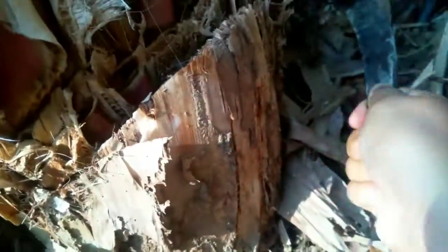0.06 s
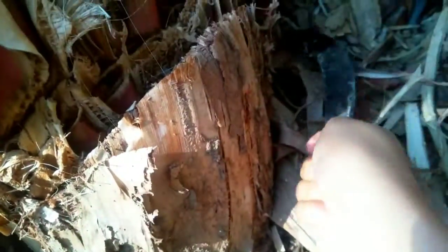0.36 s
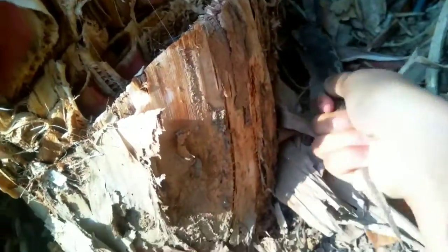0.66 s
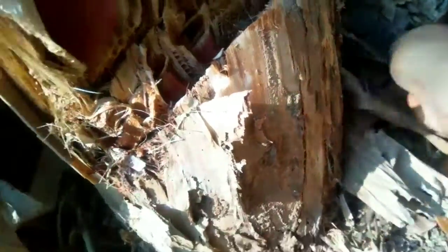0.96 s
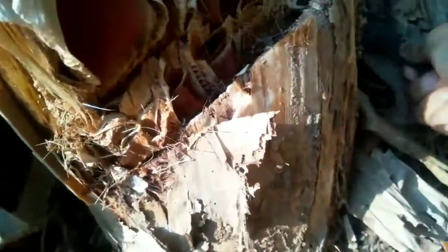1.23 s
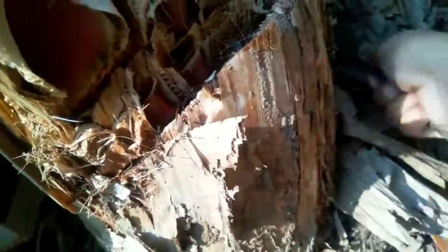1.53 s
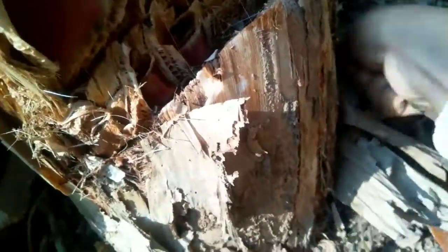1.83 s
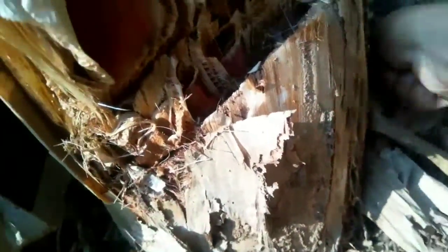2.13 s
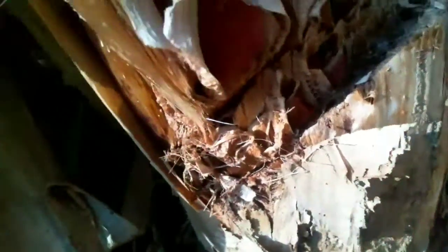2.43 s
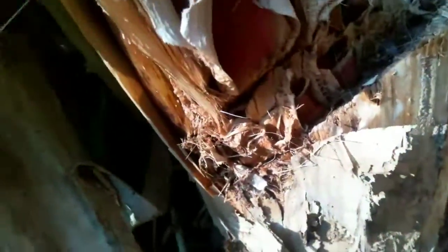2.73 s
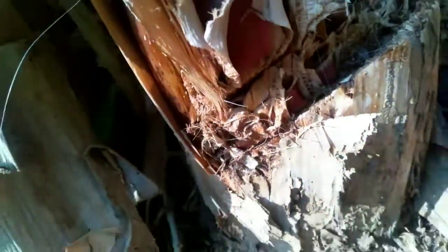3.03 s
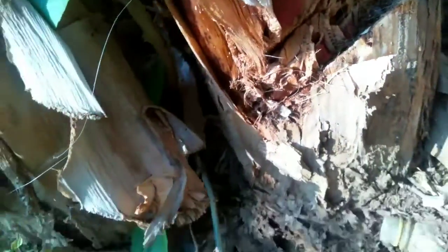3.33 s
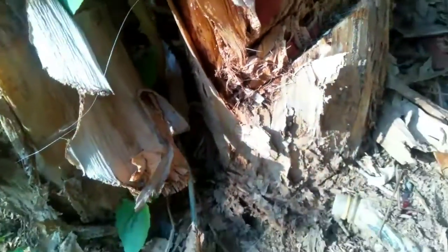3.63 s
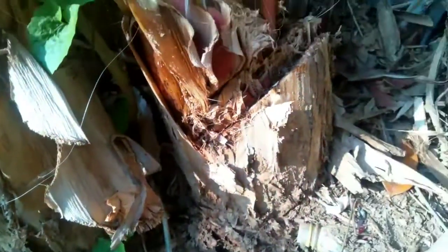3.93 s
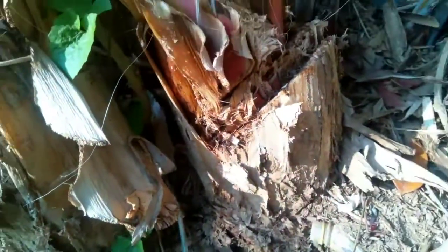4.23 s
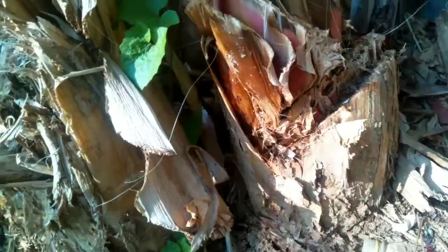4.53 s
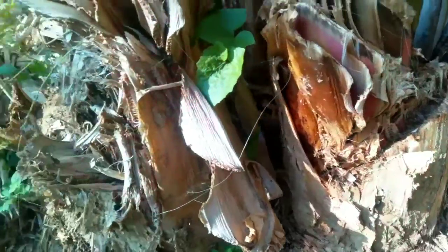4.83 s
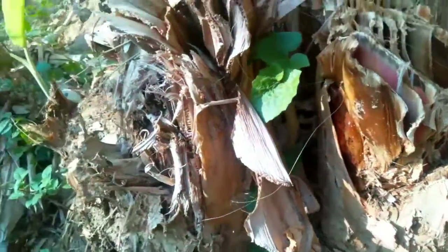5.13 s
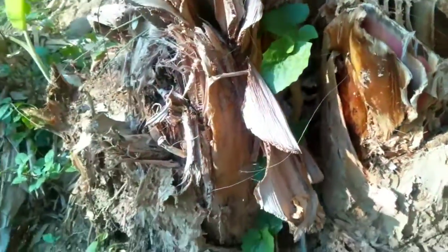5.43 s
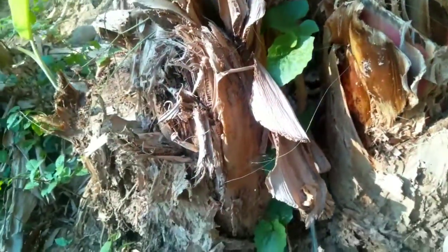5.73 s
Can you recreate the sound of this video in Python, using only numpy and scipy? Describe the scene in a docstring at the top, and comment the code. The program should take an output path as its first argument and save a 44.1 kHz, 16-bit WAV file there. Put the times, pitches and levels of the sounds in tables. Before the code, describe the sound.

Dry banana leaf sheaths are pulled off a stem by hand outdoors, making close, irregular papery rips, crackles and sharp little snaps.

```python
"""Outdoors, close up: dry banana leaf sheaths are pulled off the stem by hand.
Each pull builds, rips and lets go; a swarm of breaking fibres ticks, shakes the papery sheet and
makes its curled hollow rumble. Ribs snap singly, folds pop over, the stem takes dull knocks.
A knife brushes the sheath at the start and rings thinly. Between pulls the loose sheath rustles,
ticks and once squeaks. Far behind: faint chirps and the murmur of open air."""
import sys
import numpy as np
from scipy import signal
from scipy.fft import rfft, irfft
from scipy.io import wavfile
from scipy.ndimage import uniform_filter1d

SR = 44100
rng = np.random.default_rng(int(sys.argv[2]) if len(sys.argv) > 2 else 0)


def to_wav(s):
    """Save 16-bit WAV."""
    ch = np.atleast_2d(s).T  # columns
    pcm = np.round(np.clip(ch, -1, 1) * 32767)  # PCM
    wavfile.write(sys.argv[1], SR, pcm.astype(np.int16))


N = 262836

# fibre tick spectrum: (frequency [Hz], relative level [dB])
FIBRE_SPECTRUM = [(3000, -45.5), (5500, -13), (9500, -6), (11000, -0.5), (12000, 3), (13000, -2),
                  (14200, -3.5), (15500, -13)]
# sheet crackle spectrum: (frequency [Hz], relative level [dB])
SHEET_SPECTRUM = [(110, -48.5), (500, -11), (1300, -6.5), (1600, -3), (2100, 0), (2900, 1), (3300, -0.5),
                  (4200, 2), (5500, -2.5), (7500, -4.5), (12000, -17)]


def fractures(fibre_db, rate_hz, ref_db, crowding, spread_db, clump_db, catch_db):
    """Impulses of breaking fibres: denser under a harder pull, a few much thicker than the rest."""
    pulled_rate_hz = rate_hz * from_db(crowding * (fibre_db - ref_db))
    breaks = rng.random(N) < pulled_rate_hz / SR
    thickness = np.minimum(rng.exponential(1, N), 4)
    grip_db = clump_db * wander(300) + catch_db * wander(70)   # the tear catches and gives way
    return breaks * rng.choice([-1, 1], N) * from_db(spread_db * thickness + grip_db)


def tearing(cracks, level_db, spectrum, ring_s, ring_db, even_s, rub_db, spots=14):
    """The tear travels over spots with their own resonances; rubbing layers add a fine hiss."""
    travel = np.arange(N) / SR * 17 + .6 * rng.standard_normal(N)   # 17 spots per second
    spot = np.floor(travel) % spots
    crackle = np.zeros(N)
    for k in range(spots):
        stiffness = np.exp(.05 * rng.standard_normal())   # stiffer rings higher
        click = click_of(np.array(spectrum) * [stiffness, 1])
        response = through(spot_response(ring_s, ring_db, scatter_db=-7), click)
        crackle += through(cracks * (spot == k), response)
    rub = np.sqrt(smooth(cracks ** 2, 0.014)) * through(rng.standard_normal(N), click_of(spectrum))
    crackle += from_db(rub_db) * rub
    # level_db sets the mean power; single fractures still stand out
    return from_db(level_db) * crackle / np.sqrt(smooth(crackle ** 2, even_s) + 1e-12)


def handling():
    """Fibre, sheet and hollow levels in dB: the powers of holding, rustling and pulling add."""
    # ripping pulls: (rip start [s], build [s], hold [s], release [s], fibre [dB], sheet [dB], hollow [dB])
    pulls = [(0.599, 0.09, 0.0039, 0.043, -29.5, -41, -47), (0.983, 0.072, 0.048, 0.052, -22.5, -35, -45),
             (1.433, 0.024, 0.027, 0.048, -23, -34, -44), (1.563, 0.058, 0.0095, 0.081, -21, -31, -40.5),
             (1.726, 0.0069, 0.052, 0.083, -32, -40, -48), (1.882, 0.051, 0.035, 0.073, -26, -33.5, -42.5),
             (2.042, 0.046, 0.032, 0.09, -25.5, -31.5, -46), (2.39, 0.037, 0.034, 0.025, -20, -25.5, -43),
             (2.745, 0.053, 0.046, 0.026, -20, -24.5, -32), (2.795, 0.025, 0.02, 0.017, -19, -34, -33),
             (2.88, 0.051, 0.081, 0.084, -30, -36.5, -43.5),
             (3.08, 0.045, 0.059, 0.051, -24.5, -33.5, -34.5),
             (3.375, 0.028, 0.048, 0.055, -21.5, -32.5, -37.5), (3.618, 0.022, 0.026, 0.024, -22, -39, -55),
             (4.136, 0.0055, 0.0094, 0.13, -39.5, -47, -47.5), (4.399, 0.14, 0.048, 0.029, -42, -54.5, -49),
             (4.598, 0.0078, 0.0083, 0.054, -27.5, -36, -37.5),
             (5.486, 0.006, 0.045, 0.028, -33.5, -40.5, -51)]
    # bends of loose sheath: (middle [s], length [s], fibre [dB], sheet [dB])
    rustles = [(0.525, 0.13, -44, -59), (0.727, 0.038, -43, -58.5), (0.776, 0.026, -37.5, -48.5),
               (0.854, 0.094, -44, -52.5), (1.128, 0.14, -41, -52), (1.398, 0.027, -35, -39),
               (1.537, 0.0084, -21.5, -39), (1.644, 0.15, -39, -50.5), (2.119, 0.013, -27, -46),
               (2.191, 0.047, -29.5, -42), (2.256, 0.091, -36, -40), (2.46, 0.2, -33.5, -44.5),
               (2.592, 0.078, -32, -39.5), (3.28, 0.1, -36.5, -44.5), (3.513, 0.11, -42, -54),
               (3.68, 0.022, -32, -48), (3.798, 0.1, -40, -58), (3.919, 0.044, -41, -58.5),
               (4.274, 0.089, -39.5, -56), (4.695, 0.052, -42, -52.5), (5.253, 0.081, -46, -55),
               (5.42, 0.15, -46.5, -57), (5.596, 0.11, -43, -51), (5.95, 0.1, -40, -53)]
    held_fibre_db, held_sheet_db, hollow_re_sheet_db = -53.5, -69.5, -7
    slack = from_db([[held_fibre_db], [held_sheet_db]]) ** 2
    for middle_s, length_s, *levels_db in rustles:
        slack = slack + np.outer(from_db(levels_db) ** 2, swell(middle_s, length_s))
    power = np.vstack([slack, slack[1] * from_db(hollow_re_sheet_db) ** 2])
    for start_s, build_s, hold_s, release_s, *levels_db in pulls:
        power += np.outer(from_db(levels_db) ** 2, pull_shape(start_s, build_s, hold_s, release_s))
    return 10 * np.log10(power)


def pull_shape(start_s, build_s, hold_s, release_s, ramp_db=19.5):
    """Power envelope, peak 1: tension builds exponentially, holds during the rip, dies away."""
    t = np.arange(N) / SR
    early_s, late_s = np.maximum(start_s - t, 0), np.maximum(t - start_s - hold_s, 0)
    drop_db = ramp_db * (early_s / build_s + late_s / release_s)
    return from_db(-np.minimum(drop_db, 120)) ** 2


def spot_response(ring_s, ring_db, scatter_db, scatter_s=0.0072, size=2048):
    """One spot of sheath: impulse, brief ringing, scatter from stem and litter."""
    t = np.arange(size) / SR
    ringing, scatter = rng.standard_normal((2, size))
    response = from_db(ring_db) * unit_energy(ringing * np.exp(-t / ring_s))
    response += from_db(scatter_db) * unit_energy(scatter * np.exp(-t / scatter_s))
    response[0] += 1
    return unit_energy(response)


def rib_snaps(tail_db, tail_s, size=2048):
    """A rib cracks in one sharp spike; the sheath shivers on briefly."""
    # breaking ribs: (time [s], fibre energy [dB], sheet energy [dB])
    snaps = [(0.1217, 4, -19), (0.1512, -1.5, -20), (0.6, 0.5, -25), (0.6061, 3, -9), (0.9915, 5, -18),
             (1.038, 0, -13), (1.0876, -2, -19.5), (1.3857, 0, -9.5), (1.431, -4, -19), (1.4476, 4, -18),
             (1.45, 0, -11), (1.4645, 4, -19), (1.5012, -2.5, -14), (1.57, -9, -6.5), (1.577, 5, -10),
             (2.075, 2, -16), (2.1454, -4, -18), (2.1821, -3, -11.5), (2.3606, 1, -9), (2.4036, 4, -2),
             (2.4286, 5, 3.5), (2.7163, -3, 2), (2.7247, -0.5, -21), (2.7283, 3, 0), (2.742, 2, 0),
             (2.7535, 5, -5), (2.816, 2, -9), (2.8625, 0, -20), (2.8838, -3.5, -20), (3.0024, -3.5, -15),
             (3.0982, 7.5, -0.5), (3.182, -6.5, -23), (3.2272, 0.5, -17), (3.368, -12, -14),
             (3.3893, 2, -2), (3.5838, 1, -14), (3.701, -9, -18), (4.1344, -7, -21), (4.573, -12, -21),
             (4.581, -12, -9), (4.601, -17, -7), (4.611, -7, -10), (4.697, -18, -29), (4.8422, -19, -39),
             (4.9103, -16.5, -34), (4.947, -26, -42), (5.049, -17, -32), (5.147, -23, -27.5),
             (5.4284, 2, -9), (5.488, -7, -7.5), (5.596, -5.5, -25), (5.861, -23, -23)]
    out, t = np.zeros(N), np.arange(size) / SR
    clicks = [click_of(FIBRE_SPECTRUM), click_of(SHEET_SPECTRUM)]
    for time_s, *energies_db in snaps:
        crack = spot_response(ring_s=.0006, ring_db=-5, scatter_db=-14)
        crack += from_db(tail_db) * unit_energy(rng.standard_normal(size) * np.exp(-t / tail_s))
        for energy_db, click in zip(energies_db, clicks):
            add(out, time_s, from_db(energy_db) * unit_energy(through(crack, click)))
    return out


def fold_pops(sheet_db, rate_hz, over_db, low_hz, high_hz, t60_s):
    """Folds pop over and ring: a few stiff ones, many small ones that follow the sheet level."""
    # stiff folds: (time [s], level [dB], pitch [Hz])
    folds = [(2.755, -14, 2120), (3.2268, -25, 3820), (4.602, -28, 3960), (5.231, -37.5, 1850)]
    out = np.zeros(N)
    for time_s, level_db, hz in folds:
        add(out, time_s, from_db(level_db) * mode(hz, t60_s))
    for when, stiffness, strength in rng.random((int(rate_hz * N / SR), 3)):
        pop = mode(low_hz * (high_hz / low_hz) ** stiffness, t60_s * .5 ** stiffness)
        add(out, when * N / SR, from_db(sheet_db[int(when * N)] + over_db) * strength * pop)
    return out


def stem_knocks(contact_s, highpass_hz, size=8192):
    """A soft contact rings one damped mode of the hollow stem, too light to radiate much bass."""
    # sheath and stalks hitting the stem: (time [s], drive [dB], pitch [Hz], t60 [s])
    knocks = [(0.61, -35, 230, 0.052), (2.408, -27, 383, 0.086), (2.524, -25.5, 770, 0.016),
              (2.794, -10.5, 670, 0.018), (3.0981, -6.5, 442, 0.019), (3.3894, -4.5, 587, 0.0076),
              (3.58, -33, 218, 0.077), (4.137, -27, 308, 0.0097), (4.573, -33, 424, 0.028),
              (4.6, -21, 1054, 0.031), (4.604, -32, 1420, 0.082), (4.603, -22, 330, 0.029),
              (4.697, -33, 960, 0.017)]
    out, t = np.zeros(N), np.arange(size) / SR
    attack = 1 - np.exp(-t / contact_s)
    for time_s, drive_db, hz, t60_s in knocks:
        add(out, time_s, from_db(drive_db) * mode(hz, t60_s) * attack)
    return signal.sosfilt(signal.butter(2, highpass_hz, "high", fs=SR, output="sos"), out)


def knife(cracks, t60_s, tick_db):
    """Steel scrapes dry fibres: each catch ticks and rings the blade's high modes."""
    # blade strokes: (middle [s], length [s], level [dB])
    scrapes = [(0.052, 0.021, -39), (0.129, 0.012, -22.5), (0.151, 0.005, -32), (0.177, 0.013, -31.5),
               (0.238, 0.037, -42.5), (0.274, 0.0037, -31), (0.318, 0.022, -41.5)]
    # blade modes: (frequency [Hz], relative level [dB])
    blade_modes = [(3750, -19.5), (8860, -8), (10000, 1), (11380, 6), (11730, 9), (12720, -2), (13800, -8)]
    ringing = unit_energy(sum(from_db(db) * mode(hz, t60_s) for hz, db in blade_modes))
    grit = cracks + np.std(cracks) * rng.standard_normal(N)
    power = sum(from_db(db) ** 2 * swell(middle_s, length_s) for middle_s, length_s, db in scrapes)
    contact = grit / np.std(grit) * np.sqrt(power)
    return through(contact, ringing) + from_db(tick_db) * through(contact, click_of(FIBRE_SPECTRUM))


def edge_ticks(rate_hz, top_db, range_db):
    """Dry edges of the held sheath catch and let go in lone, faint ticks."""
    out, click = np.zeros(N), click_of(FIBRE_SPECTRUM)
    for when, weakness in rng.random((int(rate_hz * N / SR), 2)):
        tick = through(spot_response(ring_s=.0005, ring_db=0, scatter_db=-14), click)
        add(out, when * N / SR, from_db(top_db - range_db * weakness) * tick)
    return out


def squeak(middle_s, length_s, pitch_hz, blur_hz, level_db):
    """Two smooth faces of sheath slide with a thin, unsteady tone."""
    phase = 2 * np.pi * np.cumsum(pitch_hz + blur_hz * wander(1500)) / SR
    return from_db(level_db) * np.sqrt(2 * swell(middle_s, length_s)) * np.sin(phase)


def far_chirps(blur_hz, fall):
    """Short falling calls, blurred in pitch and broken up by distance."""
    # distant calls: (middle [s], length [s], pitch [Hz], level [dB])
    chirps = [(3.983, 0.18, 611, -63), (4.139, 0.05, 1280, -51.5), (4.41, 0.011, 1280, -50),
              (4.89, 0.21, 1087, -62.5), (5.8, 0.038, 2830, -60)]
    out, t = np.zeros(N), np.arange(N) / SR
    for middle_s, length_s, hz, level_db in chirps:
        progress = np.clip(2 * (t - middle_s) / length_s, -3, 3)
        phase = 2 * np.pi * np.cumsum(hz * (1 - fall * progress) + blur_hz * wander(400)) / SR
        flutter = wander(220)
        out += from_db(level_db) * np.sqrt(2) * flutter * np.sin(phase) * np.exp(-progress ** 2)
    return out


def open_air(level_db):
    """Steady distant murmur: coloured noise."""
    # outdoor background spectrum: (frequency [Hz], relative level [dB])
    air_spectrum = [(90, -15.5), (210, 1), (400, -4.5), (520, -6), (680, -2.5), (900, -7.5), (1500, -9),
                    (5000, -9.5), (15000, -9.5)]
    return from_db(level_db) * through(rng.standard_normal(N), click_of(air_spectrum))


def click_of(spectrum, size=2048):
    """Minimum-phase click with the given spectrum, energy 1."""
    hz, db = np.transpose(spectrum)
    grid_hz = np.maximum(np.fft.rfftfreq(size, 1 / SR), 1)
    magnitude = from_db(np.interp(np.log(grid_hz), np.log(hz), db))
    cepstrum = irfft(np.log(magnitude))
    return unit_energy(irfft(np.exp(rfft(2 * cepstrum[:size // 2], size))))


def mode(hz, t60_s, size=8192):
    """Struck resonance: a decaying sine."""
    t = np.arange(size) / SR
    return np.sin(2 * np.pi * hz * t) * np.exp(-np.log(1000) * t / t60_s)


def swell(middle_s, length_s):
    """Steep-sided power envelope, peak 1, above half for length_s."""
    distance = np.abs(2 * (np.arange(N) / SR - middle_s) / length_s)
    return .5 ** np.minimum(distance ** 3, 40)


def wander(rate_hz):
    """Random curve, rate_hz new values a second, spread about 1."""
    steps = np.arange(N) / SR * rate_hz
    return np.interp(steps, np.arange(N), rng.standard_normal(N))


def smooth(power, width_s):
    """Triangular moving average."""
    width = max(int(width_s * SR), 2)
    return np.abs(uniform_filter1d(uniform_filter1d(power, width), width))


def through(x, response):
    """Convolve, keeping the length."""
    return signal.oaconvolve(x, response)[:len(x)]


def add(out, time_s, sound):
    """Mix in at time_s."""
    start = int(np.clip(round(time_s * SR), 0, N - 1))
    out[start:start + len(sound)] += sound[:N - start]


def unit_energy(x):
    """Scale to a sum of squares of 1."""
    return x / np.sqrt(np.sum(x ** 2) + 1e-20)


def from_db(db):
    """Decibels to gain."""
    return 10 ** (np.asarray(db) / 20)


def scene():
    """One swarm of fractures drives fibre, sheet and hollow; the other sources add on top. Mono."""
    # rumble spectrum of the curled sheath: (frequency [Hz], relative level [dB])
    hollow_spectrum = [(105, -58), (180, -4.5), (330, 4), (520, 1), (720, 1.5), (900, -1), (1300, -2.5),
                       (2500, -18)]
    fibre_db, sheet_db, hollow_db = handling()
    cracks = fractures(fibre_db, rate_hz=2600, ref_db=-30, crowding=0.37,
                       spread_db=1.5, clump_db=2, catch_db=0.5)
    jolts = cracks * np.abs(cracks) ** .85   # thick fibres shake the sheet most
    fibre = tearing(cracks, fibre_db, FIBRE_SPECTRUM, ring_s=.0013, ring_db=5, even_s=.022, rub_db=-6)
    sheet = tearing(jolts, sheet_db, SHEET_SPECTRUM, ring_s=.0016, ring_db=3, even_s=.045, rub_db=-14)
    hollow = tearing(cracks, hollow_db, hollow_spectrum, ring_s=.0041, ring_db=1, even_s=.042, rub_db=-7)
    pops = fold_pops(sheet_db, rate_hz=90, over_db=9.5, low_hz=1750, high_hz=8500, t60_s=.018)
    edges = edge_ticks(rate_hz=24, top_db=-19, range_db=10)
    air = open_air(level_db=-56.3)
    ribs = rib_snaps(tail_db=-2, tail_s=.0035)
    stem = stem_knocks(contact_s=.0012, highpass_hz=182)
    blade = knife(cracks, t60_s=.012, tick_db=-6)
    calls = far_chirps(blur_hz=64.8, fall=0.016)
    slide = squeak(middle_s=4.38, length_s=0.13, pitch_hz=11500, blur_hz=150, level_db=-45)
    return (fibre + sheet + hollow + ribs + pops + stem + blade + edges + slide + calls + air)[None]


def record(dry, highpass_hz=135, lowpass_hz=15550):
    """The small microphone loses deep bass; the top is cut steeply."""
    thin = signal.sosfilt(signal.butter(3, highpass_hz, "high", fs=SR, output="sos"), dry)
    return signal.sosfilt(signal.ellip(10, .3, 80, lowpass_hz, fs=SR, output="sos"), thin)


dry = scene()
out = record(dry)
to_wav(out)
```